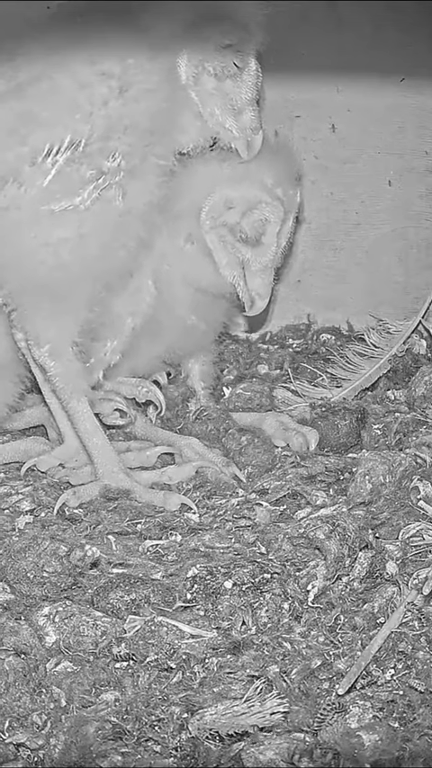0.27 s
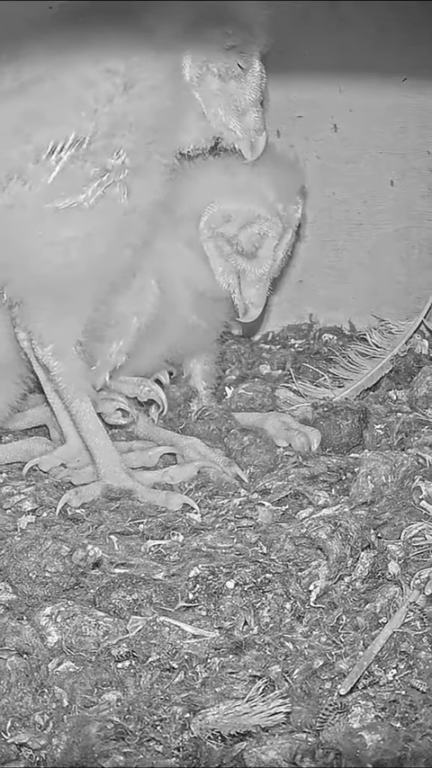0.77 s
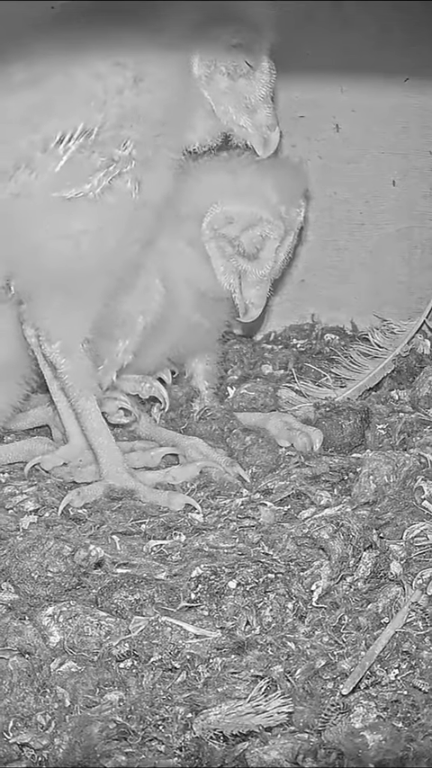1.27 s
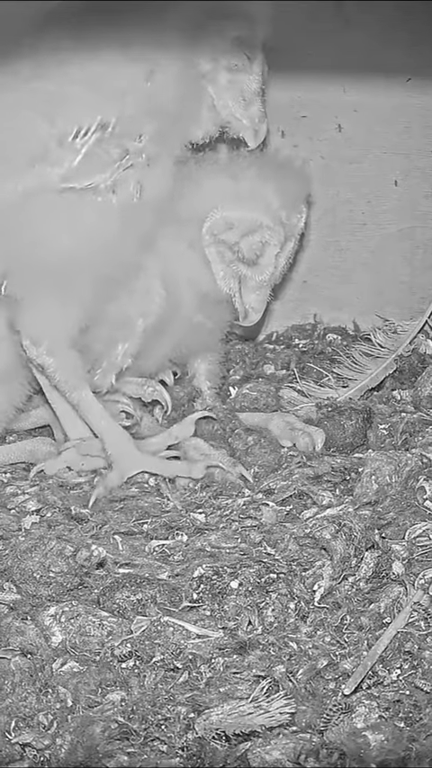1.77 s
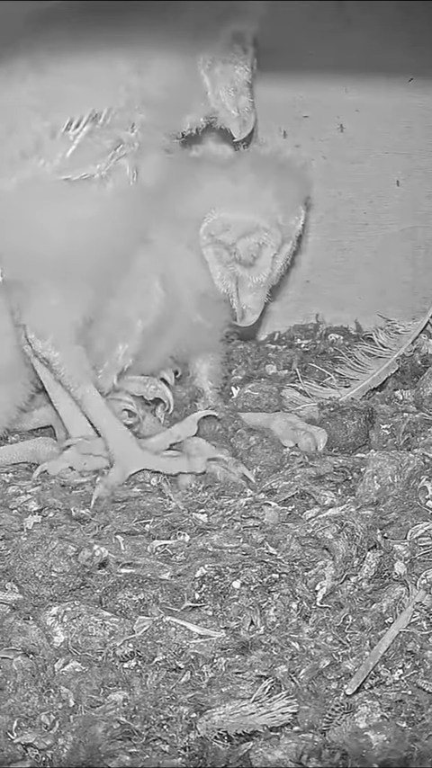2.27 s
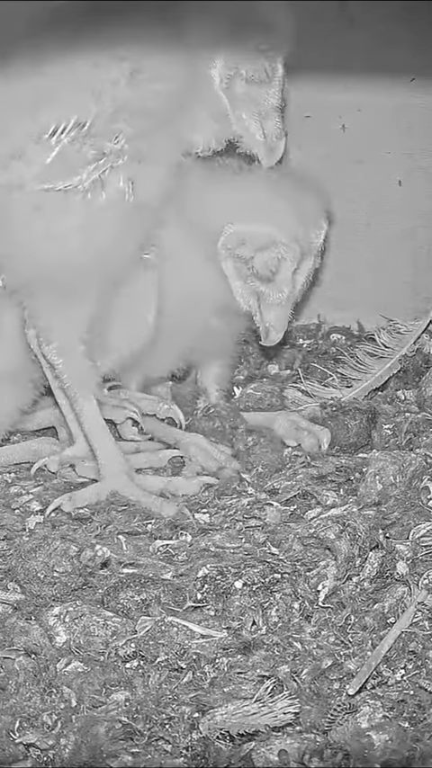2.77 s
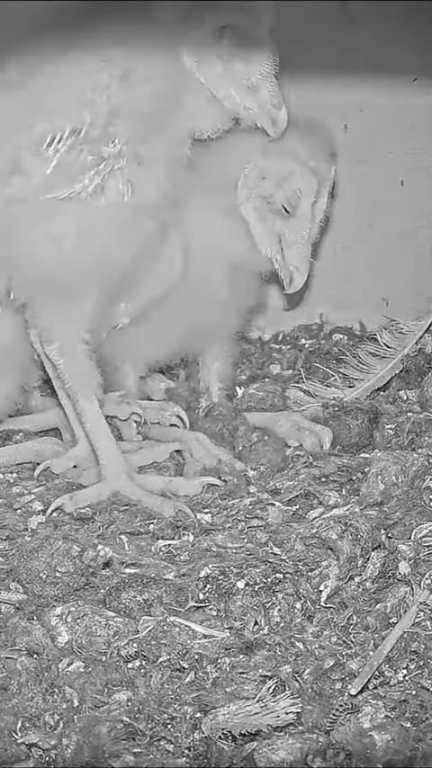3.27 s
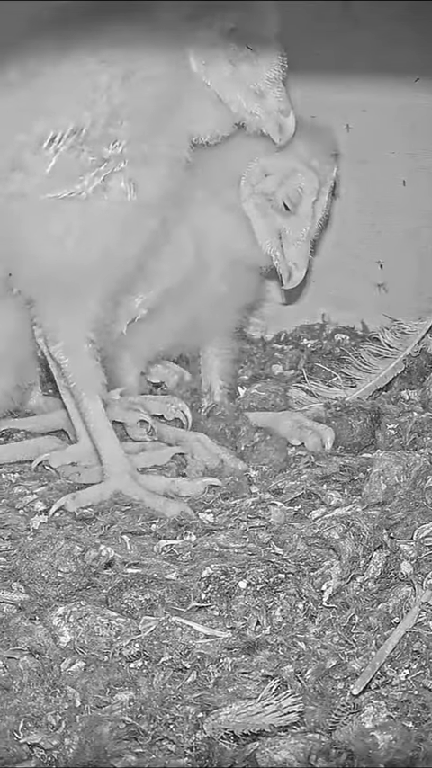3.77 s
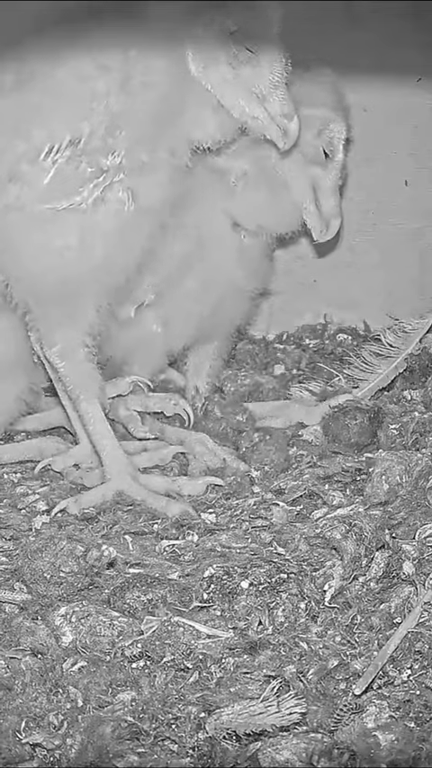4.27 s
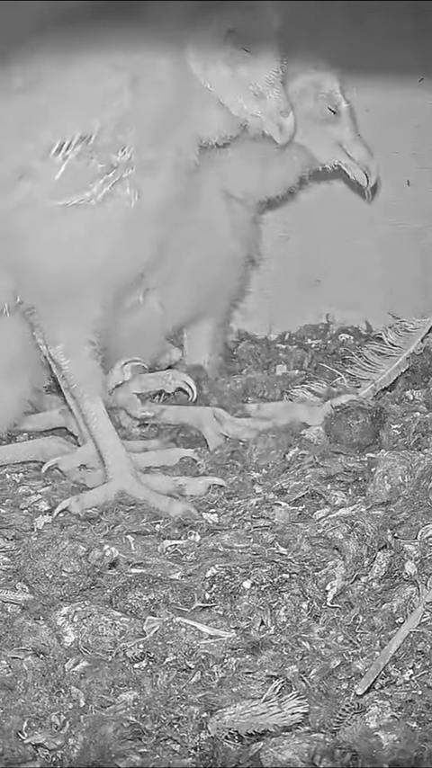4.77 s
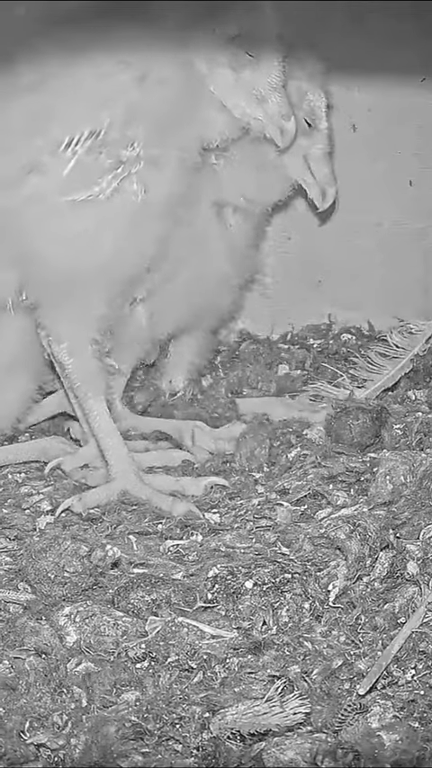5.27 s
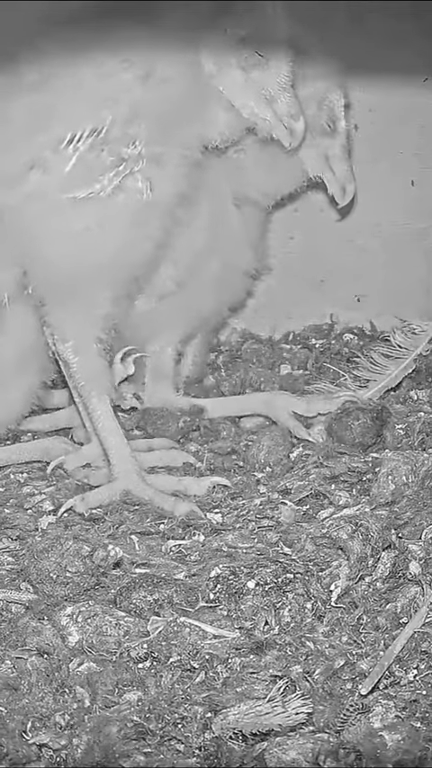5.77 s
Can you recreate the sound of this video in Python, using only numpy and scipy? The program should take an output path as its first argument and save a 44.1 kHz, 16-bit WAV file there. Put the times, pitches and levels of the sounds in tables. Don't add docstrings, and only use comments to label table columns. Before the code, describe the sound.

Close inside a wooden nest box, owl chicks hiss four times, about a second and a half apart. Each hiss starts with a tiny throat squeak and a soft pop, brightens as the beak opens, then shuts off quickly. Low, dull knocks on the boards come mostly in the second half, with small dry claw scrapes. A quiet murmur and low wind gusts lie beneath.

```python
import sys
import numpy as np
from scipy import signal
from scipy.fft import rfft, irfft
from scipy.io import wavfile
from scipy.ndimage import uniform_filter1d

SR = 44100
rng = np.random.default_rng(int(sys.argv[2]) if len(sys.argv) > 2 else 0)


def digitize_waveform(pressure):
    field = np.atleast_2d(pressure).T
    bounded = np.clip(field, -1, 1)
    quanta = np.round(bounded * 32767).astype(np.int16)
    wavfile.write(sys.argv[1], SR, quanta)


def invert_db(x):
    u = np.asarray(x, float) / 20
    return 10 ** u


N = 264908
GRID = np.linspace(0, SR / 2, 8193)

# t/s, length/s, effort level/dB, beak resonance wide open f/Hz
HISSES = [
    (0.882, 0.58, -49, 4650),
    (2.190, 0.768, -47, 5450),
    (3.710, 0.718, -44.5, 5900),
    (5.416, 0.59, -46.5, 4850),
]
# t/s, gape [0-1]
GAPES = [
    [(0.88, 0.03), (0.99, 0.07), (1.1, 0.5), (1.2, 0.67), (1.4, 0.97)],
    [(2.19, 0.2), (2.25, 0.12), (2.34, 0.56), (2.6, 0.93), (2.75, 1.0), (2.88, 0.94)],
    [(3.71, 0.14), (3.8, 0.16), (3.95, 0.53), (4.15, 0.65), (4.36, 0.66)],
    [(5.41, 0.06), (5.5, 0.26), (5.62, 0.54), (5.75, 0.77), (5.9, 0.79)],
]
# f/Hz, f/Hz, f/Hz, f/Hz
POSES = [
    (2734, 3229, 3552, 4590),
    (2648, 3229, 3600, 4608),
    (2691, 3316, 3585, 4543),
    (2600, 3229, 3640, 4608),
]
# width/Hz, depth/dB
POSE_DIPS = [(85, 20), (85, 26), (65, 16), (80, 17)]
EDGES_HZ = [2650, 3380, 6470, 11400]
# level over the breath when shut/dB, gain when open/dB, gape of full gain [0-1], loss in closing/dB
BANDS = [
    (-22, 13, 1, -10),
    (-13.5, 14.5, 1, -8.5),
    (-12.5, 5.5, 0.56, -7.5),
    (-29.5, 7, 0.77, -6),
]
POP_DB, SWELL_SHARE = -50.5, 0.28
CLOSE_S, CLOSE_DB, SHUT_S, SHUT_DB = 0.086, -5, 0.014, -30
LEAK_S, LEAK_DB, POP_S, POP_FROM_DB = 0.016, -11, 0.025, -1.5
BEAK_SHUT_HZ, STREAKS_DB = 4960, 1.8

# f/Hz, width/Hz, level/dB
BOX_MODES = [(736, 71.5, 2), (1260, 17, -3), (1490, 36, -4), (1737, 27, 0), (2200, 17, -3), (2853, 16, -6),
             (3065, 250, -14), (3475, 280, -12.5), (3780, 15, -7.5), (3886, 57, -11.5), (4020, 21, -11.5),
             (4400, 52, -10.5), (4730, 440, -9.5), (5370, 60, -10), (5840, 47, -10.5)]
# f/Hz, width/Hz, depth/dB
LOW_DIPS = [(430, 13.3, 32.5), (893, 48, 31), (972, 39, 9), (1145, 37, 8), (1373, 76, 14.5),
            (1656, 53, 18.5), (1876, 32, 13)]
# f/Hz, width/Hz, depth/dB
HIGH_DIPS = [(2650, 180, 8), (2900, 50, 10), (3370, 60, 14), (4300, 50, 10), (6490, 80, 12), (6900, 150, 8),
             (8300, 200, 8)]
# f/Hz, level/dB per Hz
BREATH_COLOUR = [(200, -54), (380, -5), (730, -11.5), (900, -19), (1480, -2), (2300, -5), (2700, -12),
                 (5000, -22), (6450, -12.5)]
# f/Hz, level/dB per Hz
TOP_COLOUR = [(6500, -8), (7000, -3), (7700, -5), (8300, -5.5), (9300, -4.5), (10000, -4.5), (10200, -6.5),
              (11200, -13), (11500, -15), (13000, -21.5), (14200, -21.5), (15600, -30)]

# t/s, length/s, start f/Hz, level/dB, second partial level/dB
SQUEAKS = [
    (0.841, 0.043, 2870, -69, -5),
    (2.163, 0.029, 2820, -64, -5),
    (3.688, 0.024, 2760, -76, 1),
    (5.395, 0.022, 2800, -82, 1),
]
SQUEAK_SAG = 0.045

# t/s, then level/dB of the deep, middle, stiff and hard panel groups
KNOCKS = [(2.46, -54, -59, -62, -73), (2.733, -47, -42, -56.5, -69), (3.248, -43, -48, -43.5, -45.5),
          (3.269, -35, -32.5, -34, -43.5), (3.312, -48, -46, -64, -67), (3.666, -51, -79, -55, -62),
          (4.194, -29.5, -33.5, -35, -31), (4.24, -58, -44.5, -55, -63), (4.598, -29.5, -51, -29.5, -32.5),
          (4.646, -44.5, -49, -57, -62), (4.683, -60, -61, -63, -73), (4.724, -54, -67, -68, -72),
          (4.970, -28, -28, -27, -35), (5.04, -48, -52, -52, -67), (5.23, -56, -74, -74, -84),
          (5.371, -51, -33, -30, -41.5), (5.413, -41.5, -59, -65, -45), (5.584, -35.5, -41.5, -55, -43),
          (5.598, -36, -56, -42.5, -38), (5.699, -45, -51, -60, -65)]
# f/Hz, level/dB, t60/s
PANELS = [
    [(65.6, -20, 0.65), (97.9, -10, 0.61), (114.4, -5, 0.27), (127, -10.5, 0.42)],
    [(150.8, -5, 0.43), (165.3, -12, 0.32), (211.7, -10.5, 0.21)],
    [(251, -13, 0.078), (298.4, -5.5, 0.12), (337.3, -7, 0.15), (413.6, -9.5, 0.073)],
    [(499.6, 0, 0.078), (561, -5.5, 0.081), (736, -21.5, 0.13), (815, -21.5, 0.13), (1220, -28, 0.052)],
]
# t/s, length/s, level/dB, centre f/Hz
RUSTLES = [(0.81, 0.025, -76, 2200), (2.04, 0.023, -81, 11000), (3.243, 0.031, -63.5, 2200),
           (3.245, .022, -84, 7500), (3.254, .024, -80, 9000), (3.262, 0.036, -64.5, 3241),
           (4.587, 0.018, -73, 8600), (4.597, 0.023, -56, 3200), (4.68, 0.028, -75, 11000),
           (4.964, 0.019, -70, 7000), (4.967, 0.033, -58, 2200), (5.018, 0.052, -73.5, 3000)]

# f/Hz, level/dB per Hz
AIR_COLOUR = [(41, -46.5), (70, -4.5), (110, 1), (177, -14), (340, -11.5), (427, -17.5), (489, -11.5),
              (626, -26), (768, -18), (879, -30), (1650, -33), (1770, -32), (4370, -37.5), (5010, -39),
              (15500, -46)]
AIR_DB = -62.5
# f/Hz, width/Hz, level/dB
AIR_RINGS = [(331.6, 45, 7), (502, 16, 3.5), (766, 30, 2.5), (912, 48, -16.5), (1639, 78, 14),
             (2530, 210, 5.5), (3090, 270, 5), (4180, 180, -6), (5075, 650, 12.5), (6250, 340, 5.5)]
# t/s of the top, level/dB
GUSTS = [(0.46, -53), (0.82, -55), (0.93, -64), (1.25, -54), (1.6, -54), (2.18, -54.5), (2.95, -51.5),
         (3.06, -61), (3.31, -48), (3.39, -53), (3.53, -59), (3.71, -57), (4.24, -55), (4.48, -56),
         (4.64, -49), (4.72, -57), (4.82, -59), (4.98, -55), (5.05, -61), (5.14, -54.5), (5.27, -53.5),
         (5.42, -53), (5.63, -60), (5.72, -61)]
LULL_DB, GUST_RISE_S, GUST_FALL_S = -63, 0.029, 0.047
LIMIT_HZ = 15750


def hiss(start, length, effort_db, open_hz, gapes, pose):
    t = np.arange(-LEAK_S, length + 0.18, 1 / SR)
    closing = np.clip((t - length + SHUT_S) / CLOSE_S + 1, 0, 1)
    shutting = np.maximum((t - length) / SHUT_S + 1, 0)
    swell = np.sin(np.pi / 2 * np.clip(t / (SWELL_SHARE * length), 0, 1))
    breath_db = POP_DB + (effort_db - POP_DB) * swell + CLOSE_DB * closing + SHUT_DB * shutting

    opening = np.clip(np.interp(t + start, *np.transpose(gapes)), 0, 1.2)
    beak_hz = BEAK_SHUT_HZ + (open_hz - BEAK_SHUT_HZ) * opening * (1 - closing)
    late_closing = np.sin(np.pi / 2 * closing) ** 3
    bands_db = [0]
    for shut, gain, full, loss in BANDS:
        bands_db.append(shut + gain * np.minimum(opening / full, 1.2) + loss * late_closing)

    valve = np.clip(t / 0.00057, 0, 1) * invert_db(POP_FROM_DB * np.maximum(1 - t / POP_S, 0))
    leak = np.maximum(valve, invert_db(LEAK_DB) * np.minimum(2 + 2 * t / LEAK_S, 1))
    valves = [valve, valve, valve, leak, valve]

    delays, signs = rng.uniform(0.001, 0.012, 14), rng.choice([-1., 1.], 14)
    path_db = box_db(pose, delays, signs)
    air = rfft(rng.standard_normal(len(t)))
    hz = np.fft.rfftfreq(len(t), 1 / SR)
    path = invert_db(np.interp(hz, GRID, path_db))
    steps = [1] + [0.5 + 0.5 * np.tanh((hz - edge) / 60) for edge in EDGES_HZ] + [0]
    breath = np.zeros(len(t))
    for k, band_db in enumerate(bands_db):
        share = steps[k] - steps[k + 1]
        power = np.mean((share * path) ** 2)
        breath = breath + valves[k] * invert_db(breath_db + band_db) * irfft(air * share, len(t)) / np.sqrt(power)

    flutter_db = 0.46 * evened(band(rng.standard_normal(len(t)), 9.3, 98, order=1))
    return start - LEAK_S, coloured(mouth_shape(breath, t, beak_hz) * invert_db(flutter_db), path_db)


def mouth_shape(x, t, beak_hz):
    hz, frames, z = signal.stft(x, SR, nperseg=512)
    hz = hz[:, None]
    patches = uniform_filter1d(rng.standard_normal(z.shape), size=3, axis=0)
    patches = evened(uniform_filter1d(patches, size=50, axis=1))
    streaks_db = STREAKS_DB * patches * np.clip(hz / EDGES_HZ[1], 0, 1) ** 2
    centre = np.interp(frames, t - t[0], beak_hz)
    ring_db = 1.18 / (1 + (2 * (hz - centre) / 900) ** 2)
    return signal.istft(z * invert_db(ring_db - 0.5 + streaks_db), SR, nperseg=512)[1][:len(x)]


def box_db(pose, delays, signs):
    modes = sum(invert_db(2 * db) / (1 + (2 * (GRID - hz) / width) ** 2) for hz, width, db in BOX_MODES)
    below = 10 * np.log10(modes + invert_db(2 * (read(BREATH_COLOUR, GRID) - 4.0)))
    above = read(TOP_COLOUR, GRID) - 14.0
    top_hz = TOP_COLOUR[0][0]
    echoes = 1 + 0.29 * (signs * np.exp(-2j * np.pi * GRID[:, None] * delays)).sum(axis=1)
    ripple_db = 20 * np.log10(abs(echoes) + 0.061) * np.clip(GRID / top_hz, 0, 1) ** 2
    pose_dips = [(hz, *dip) for hz, dip in zip(pose, POSE_DIPS)]
    dips_db = bumps([*LOW_DIPS, *HIGH_DIPS, *pose_dips], GRID)
    return np.where(GRID < top_hz, below, above) - dips_db + ripple_db


def squeak(length, hz, db, second_db):
    u = np.linspace(0, 1, round(length * SR))
    unsteady = evened(uniform_filter1d(rng.standard_normal(len(u)), 120))
    turns = np.cumsum(hz * (1 - SQUEAK_SAG * u ** 2) * (1 + 0.013 * unsteady)) / SR
    partials = [(1, 0), (2, second_db), (3, second_db - 10), (4, second_db - 17)]
    tone = sum(invert_db(g) * np.sin(2 * np.pi * k * turns) for k, g in partials)
    return invert_db(db) * tone * np.sin(np.pi * u ** 0.77)


def knock(groups_db, chance):
    t = np.arange(round(0.7 * SR)) / SR
    ring, k = np.zeros(len(t)), 0
    rises_s = [0.024, 0.0064, 0.0084, 0.0053]
    for group_db, group, rise in zip(groups_db, PANELS, rises_s):
        onset = np.sin(np.pi / 2 * np.minimum(t / rise, 1)) ** 2
        for hz, mode_db, t60 in group:
            k += 1
            detune = 1 + 0.014 * chance[k]
            arrival = 0.006 + 0.0006 * chance[-k]
            size = invert_db(group_db + mode_db - 60 * t / t60) * onset
            size *= 1 + 250 / hz * np.exp(-(t / 0.015) ** 2)
            ring -= size * np.cos(2 * np.pi * hz * detune * (t - arrival))
    rattle = evened(band(rng.standard_normal(len(t)), 80, 200, order=2)) * np.minimum(t / 0.026, 1)
    rattle_db = max(groups_db[:2]) - 20 - 60 * t / 0.55
    return band(ring + rattle * invert_db(rattle_db), 70, 1500, order=2)


def rustle(length, db, hz):
    u = np.linspace(0, 1, round(length * SR))
    puff = np.sin(np.pi * u ** 0.54) ** 2
    return invert_db(db) * evened(band(rng.standard_normal(len(u)), hz * 0.52, hz * 1.18, order=1)) * puff


def outside():
    t = np.arange(N) / SR
    colour_db = read(AIR_COLOUR, GRID) + bumps(AIR_RINGS, GRID) - 0.26 * bumps(HIGH_DIPS, GRID)
    murmur = evened(coloured(rng.standard_normal(N), colour_db))
    drift_db = evened(band(rng.standard_normal(N), 0.11, 3.9, order=1))
    push = evened(band(rng.standard_normal(N), 32, 57.8, order=3))
    push /= np.sqrt(uniform_filter1d(push ** 2, 3500) + 0.19)
    return invert_db(AIR_DB + drift_db) * murmur + gusts(t) * push


def gusts(t):
    power = invert_db(2 * LULL_DB)
    for s, db in GUSTS:
        spread = np.where(t < s, GUST_RISE_S, GUST_FALL_S)
        power = power + invert_db(2 * db) * np.exp(-((t - s) / spread) ** 2)
    return np.sqrt(power)


def evened(x):
    return x / np.sqrt(np.mean(x ** 2) + 1e-20)


def read(points, hz):
    f, value = np.transpose(points)
    return np.interp(np.log(hz + 1), np.log(f + 1), value)


def bumps(rows, hz):
    return sum(db / (1 + (2 * (hz - f) / width) ** 2) for f, width, db in rows)


def coloured(x, gain_db):
    log_gain = np.log(invert_db(np.maximum(gain_db, -100)))
    circle = np.concatenate([log_gain, log_gain[-2:0:-1]])
    taps = np.fft.ifft(np.exp(np.conj(signal.hilbert(circle)))).real
    return signal.fftconvolve(x, taps[:len(gain_db)])[:len(x)]


def band(x, lo_hz, hi_hz, order=3):
    sos = signal.butter(order, [lo_hz, min(hi_hz, SR / 2.1)], "band", fs=SR, output="sos")
    return signal.sosfilt(sos, x)


def add(mix, s, sound):
    part = mix[round(s * SR):][:len(sound)]
    part += sound[:len(part)]


def scene():
    mix = outside()
    for row, gapes, pose in zip(HISSES, GAPES, POSES):
        add(mix, *hiss(*row, gapes, pose))
    for s, *row in SQUEAKS:
        add(mix, s, squeak(*row))
    chances = rng.standard_normal((len(KNOCKS), 30))
    for (s, *groups_db), chance in zip(KNOCKS, chances):
        add(mix, s, knock(groups_db, chance))
    for s, *row in RUSTLES:
        add(mix, s, rustle(*row))
    return np.array([mix, mix])


def roll_off(x):
    return signal.sosfilt(signal.butter(12, 15690, fs=SR, output="sos"), x)


def record(dry):
    low_pass = signal.firwin(511, LIMIT_HZ, window=("kaiser", 9), fs=SR)
    limited = signal.oaconvolve(dry, low_pass[None], "same")
    return roll_off(limited)


dry = scene()
out = record(dry)
digitize_waveform(out)
```